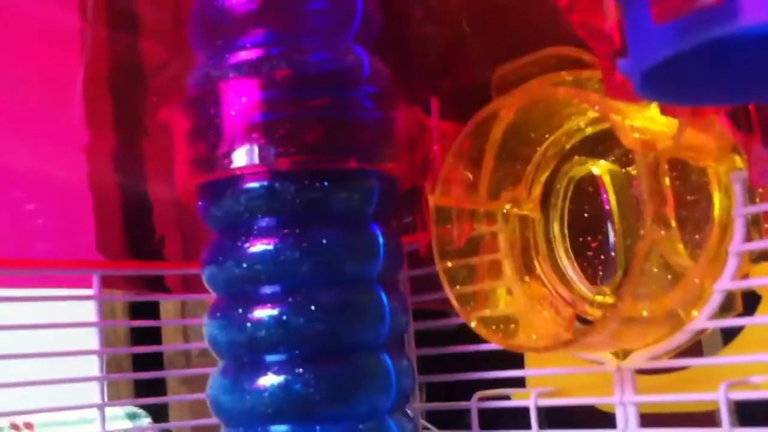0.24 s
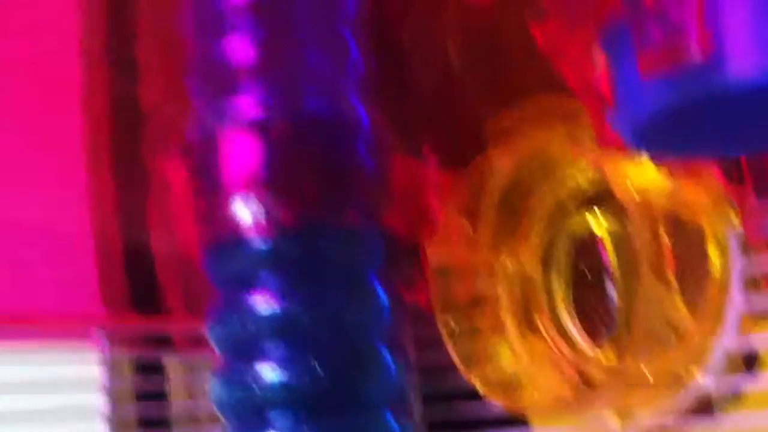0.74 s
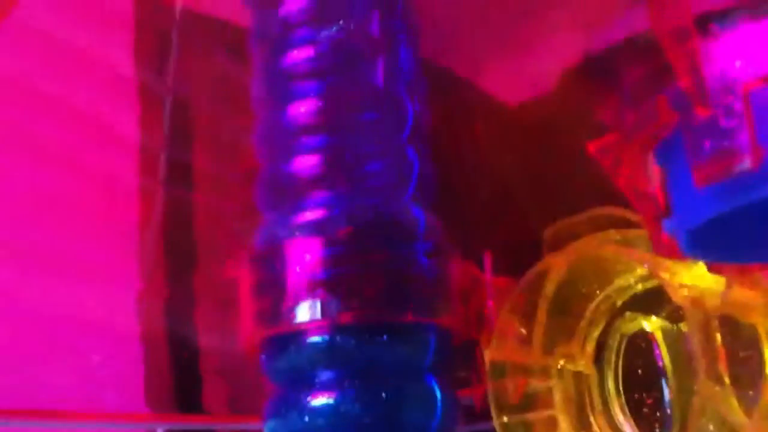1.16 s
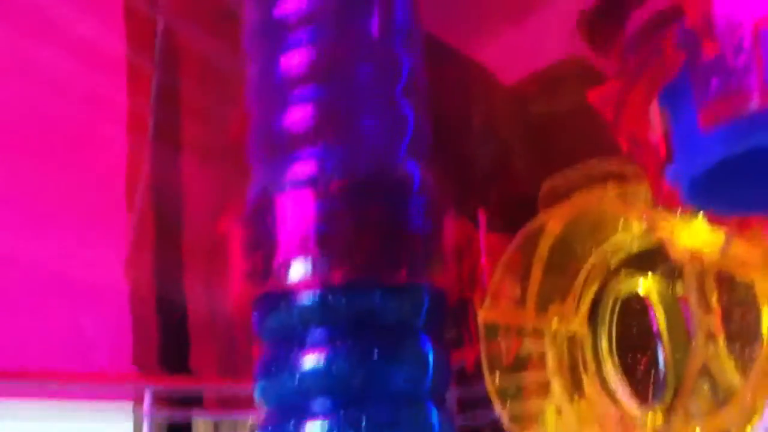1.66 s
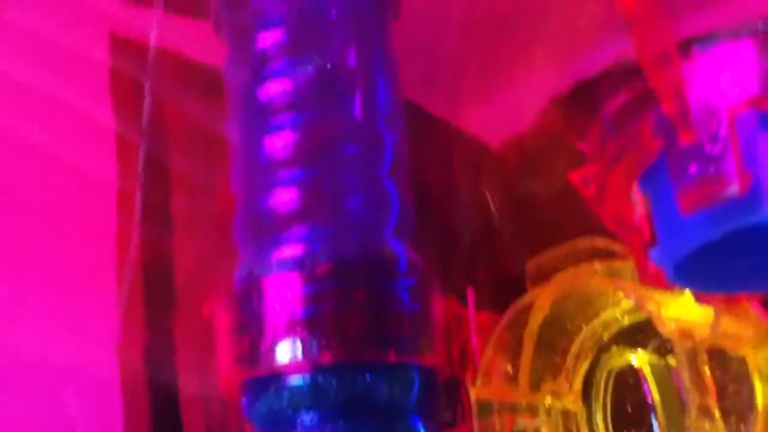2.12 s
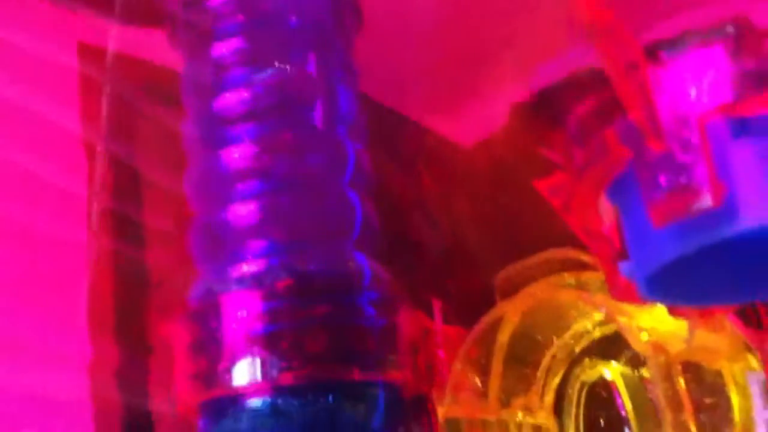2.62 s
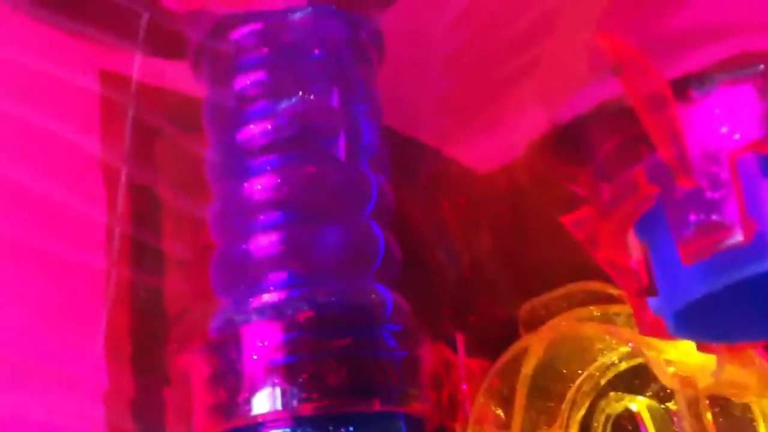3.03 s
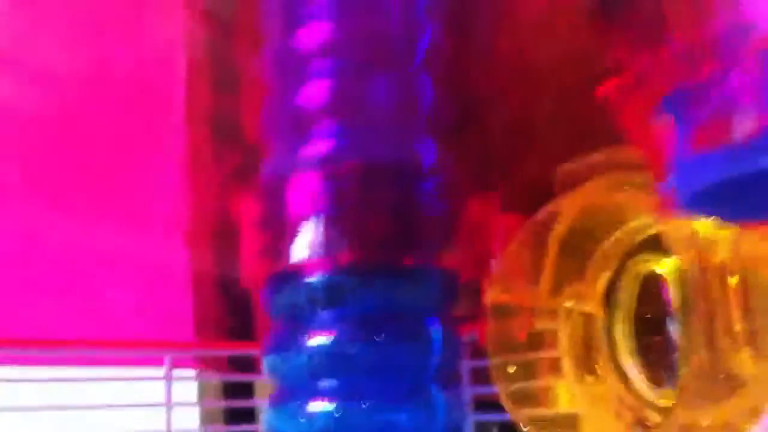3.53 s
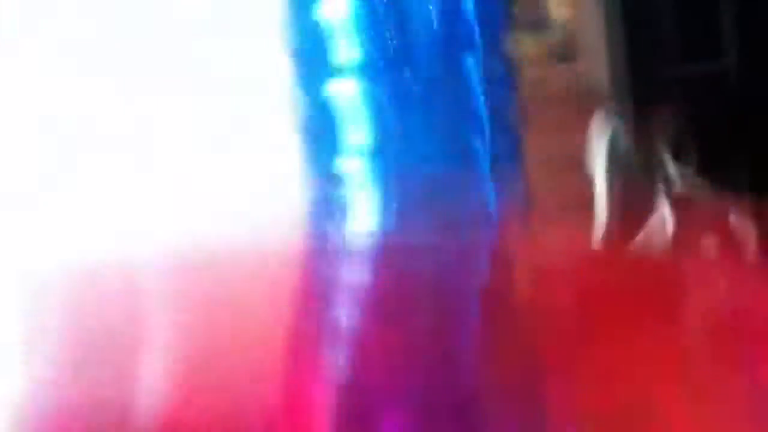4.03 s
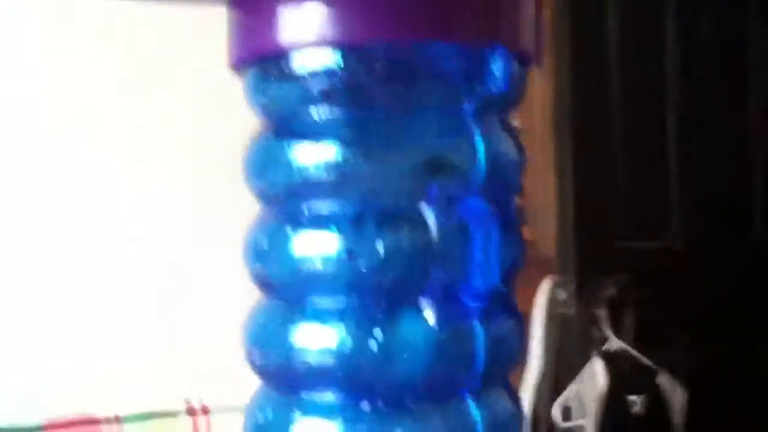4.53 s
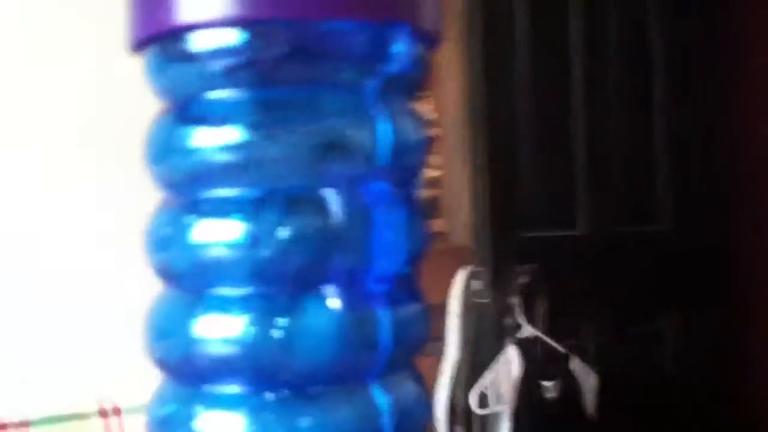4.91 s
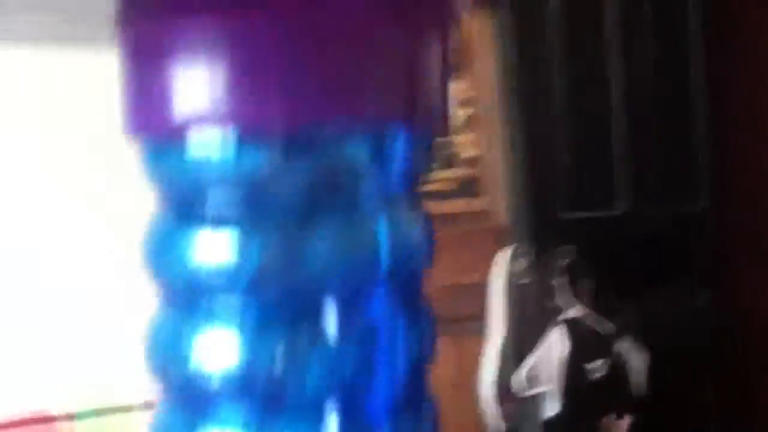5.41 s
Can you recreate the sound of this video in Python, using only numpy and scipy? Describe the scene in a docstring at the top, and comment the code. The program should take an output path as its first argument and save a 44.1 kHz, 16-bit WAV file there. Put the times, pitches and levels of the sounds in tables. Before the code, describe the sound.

Close handheld mono pickup indoors, very quiet at first: hiss, faint hum, grainy rustling of fur and shavings, light claw ticks with a short plastic ring. A sparse middle gives way to stronger taps, then abrupt overloaded thuds and cracks on the microphone body just after four seconds. The background dips and creeps back, with clearer taps near five and another sharp knock at about five and a half.

```python
"""Soft hiss and a low, wavering hum fill a quiet room, with faint rustles: a hamster in a plastic tube and bedding.
Grainy friction noise makes its shuffling bouts, among soft patches of pitched noise; claws tap on the tube
and excite its damped modes. Later the hand-held camera is bumped and rubbed: dry decaying thuds, cracks and
ticks, with the hiss and drag of skin. The hardest bumps make the gain control turn everything down,
after which the level creeps back."""
import sys
import numpy as np
from scipy import signal
from scipy.fft import rfft, irfft
from scipy.io import wavfile
from scipy.ndimage import uniform_filter1d

SR = 44100
rng = np.random.default_rng(int(sys.argv[2]) if len(sys.argv) > 2 else 0)


def wrap_up_sound(samples):
    """Save the sound to the file named by the first command line argument, as 16-bit audio."""
    columns = np.atleast_2d(samples).T
    # keep every value between -1 and 1, then stretch to whole-number steps
    tamed = np.clip(columns, -1, 1)
    steps = np.round(tamed * 32767).astype(np.int16)
    wavfile.write(sys.argv[1], SR, steps)


N = 249606
TIME = np.arange(N) / SR   # seconds


def from_db(db):
    """Decibels are twenty times the logarithm of an amplitude ratio; this returns the ratio."""
    return 10 ** (np.asarray(db) / 20)


def rms_one(x):
    """Dividing by the root mean square gives unit effective amplitude."""
    return x / np.sqrt(np.mean(x ** 2) + 1e-20)


def band(x, low_hz, high_hz, order=2):
    """A Butterworth band-pass has a maximally flat response between its two edges."""
    edges = [low_hz, min(high_hz, .47 * SR)]
    return signal.sosfilt(signal.butter(order, edges, "band", fs=SR, output="sos"), x)


def add(out, s, x):
    """Superposition: pressures add, so x is summed into out from time s in seconds."""
    at = max(int(s * SR), 0)
    out[at:at + len(x)] += x[:max(N - at, 0)]


def coloured_noise(spectrum):
    """White noise weighted in frequency takes on the given spectrum; the result has rms 1."""
    hz, db = np.transpose(spectrum)
    bins_hz = np.fft.rfftfreq(N, 1 / SR)
    gain = from_db(np.interp(np.log(bins_hz + 1), np.log(hz), db))
    return rms_one(irfft(rfft(rng.standard_normal(N)) * gain, N))


def dying(t, t60):
    """Linear damping gives exponential decay: the amplitude falls by 60 dB in t60 seconds."""
    return from_db(-60 * t / t60)


def wander(size, per_s):
    """Irregular modulation: straight lines join per_s random values a second."""
    steps = TIME[:size] * per_s
    knots = rng.standard_normal(int(steps[-1]) + 2)
    return np.interp(steps, np.arange(len(knots)), knots)


def stroke(start, length, attack_s, release_t60, ease_db_per_s=0):
    """Envelope of one frictional movement: linear attack, a hold that may ease off, exponential release."""
    t = np.maximum(TIME - start, 0)
    attack = np.minimum(t / attack_s, 1)
    easing = from_db(-ease_db_per_s * t)
    return attack * easing * dying(np.maximum(t - length, 0), release_t60)


def room_tone(hiss_db=-66.5):
    """Stationary broadband noise is heard as hiss; noise in a narrow band wavers in level, as hum."""
    # Spectrum of the hiss. Each row: frequency in Hz, relative level in dB per Hz.
    room_spectrum = [(18, -36.5), (30, -27.5), (81, -32), (103, -11.5), (165, -4), (204, -3), (336, -9.5),
                     (740, -19), (988, -20.5), (1960, -21.5), (2610, -24), (4300, -25), (8520, -25),
                     (12000, -38), (16000, -39.5)]
    # Components of the hum. Each row: centre in Hz, bandwidth in Hz, rms level in dB.
    hum_bands = [(119.54, 8.8, -72), (167.5, 12, -70), (354, 41, -79.5)]
    hum = 0
    for hz, width, db in hum_bands:
        noise = rng.standard_normal(N + SR)
        settled = band(noise, hz - width / 2, hz + width / 2)[SR:]   # the filter's build-up is dropped
        hum = hum + from_db(db) * rms_one(settled)
    return hum + from_db(hiss_db) * coloured_noise(room_spectrum)


def shuffle(grain_db=3.5, level_db=-2.0, shavings_db=-12.0, clump_db=2.5, stride_db=4.0):
    """Sliding friction is noise in little catches: body on tube, shavings above, swelling irregularly together."""
    # Bouts of the body along the tube and shavings.
    # Each row: start in seconds, length in seconds, level in dB before level_db.
    bout_rows = [(0.574, 0.045, -63), (0.652, 0.069, -68), (1.53, .18, -66), (1.77, 0.19, -62),
                 (2.014, 0.21, -71), (3.256, 0.18, -65), (3.488, 0.32, -65), (3.884, .08, -68),
                 (4.204, 0.075, -53), (4.432, .06, -64), (4.619, 0.05, -64.5), (4.735, 0.055, -59),
                 (4.935, 0.071, -63.5), (5.202, 0.033, -71), (5.366, 0.12, -60)]
    # Colour of fur and feet rubbing on the tube. Each row: frequency in Hz, relative level in dB per Hz.
    rub_spectrum = [(250, -39), (520, -6), (720, -1), (1500, -4), (1900, -6.5), (2700, -9.5), (3650, -1),
                    (4300, -20), (6000, -42)]
    attack_s, release_t60 = 0.022, 0.15
    fidget_db = -74.5   # rustle between the bouts, before level_db

    catches = from_db(grain_db * wander(N, 260))
    rub = rms_one(coloured_noise(rub_spectrum) * catches)
    shavings = band(rng.standard_normal(N), 5800, 10500)
    shavings = rms_one(shavings * from_db(clump_db * wander(N, 99)))
    sound = rub + from_db(shavings_db) * shavings
    bouts = sum(from_db(db) * stroke(s, length, attack_s, release_t60) for s, length, db in bout_rows)
    level = np.hypot(bouts, from_db(fidget_db))
    swell = from_db(level_db + stride_db * wander(N, 22))
    return level * swell * sound


def noise_patch(hz, length, skirt_db=-8.5, grain_db=4.0):
    """A grainy noise band swells and fades around one pitch, which sinks; higher is broader."""
    sag = .06   # the pitch starts this share above hz and ends as far below
    size = int(2 * length * SR)
    grains = rng.standard_normal(size) * from_db(grain_db * wander(size, 450))
    octaves = np.log2((np.fft.rfftfreq(size, 1 / SR) + 1) / hz)
    core = np.exp(-(octaves / (.06 + hz / 50000)) ** 2)
    skirt = from_db(skirt_db) * np.exp(-(octaves / .5) ** 2) / 2
    steady = signal.hilbert(irfft(rfft(grains) * (core + skirt), size))
    # turning the analytic signal's phase shifts all its frequencies
    shift_hz = sag * hz * np.linspace(1, -1, size)
    sinking = np.real(steady * np.exp(2j * np.pi * np.cumsum(shift_hz) / SR))
    swell = np.hanning(size) ** 2
    return rms_one(sinking * swell) * np.sqrt(np.mean(swell ** 2))


def soft_patches(faint_db=-76.0, spread_db=5.5, faint_s=0.031, count=190):
    """Soft noise patches add up: the clear ones, and many fainter at random in a middle and a high range."""
    # The clearest faint patches of pitched noise. Each row: middle in seconds,
    # half-span of the swell in seconds, level in dB, centre in Hz.
    clear_patches = [(.063, 0.048, -65.5, 3800), (0.306, .05, -70.5, 2570), (.695, 0.049, -65, 2480),
                     (0.7, 0.016, -62, 1530), (0.76, .024, -61, 3300), (0.761, 0.048, -67, 8050),
                     (0.832, .028, -68, 2700), (0.853, .044, -70, 8900), (0.901, 0.042, -67.5, 3080),
                     (.962, 0.04, -64.5, 2700), (1.193, 0.056, -68, 3420), (1.298, .03, -71, 3150),
                     (1.395, .044, -65, 3780), (1.61, 0.031, -64.5, 3540), (1.721, 0.048, -63, 7400),
                     (1.816, 0.039, -53.5, 7100), (2.159, 0.057, -80, 2860), (2.244, 0.041, -72, 3130),
                     (2.428, 0.052, -65, 3700), (2.898, 0.037, -65.5, 8150), (3.26, .044, -63, 3510),
                     (3.301, 0.04, -67, 3270), (3.347, .044, -68, 3550), (3.715, 0.025, -64, 3000),
                     (3.797, 0.017, -66, 3730), (3.84, 0.046, -64.5, 7860), (3.888, .028, -63.5, 3500),
                     (3.946, 0.038, -67, 2340), (4.249, .04, -54, 2300), (4.495, 0.025, -59.5, 1480),
                     (4.641, 0.02, -62, 1500), (4.656, 0.013, -64, 4090), (4.686, 0.023, -57.5, 3760),
                     (4.864, 0.037, -63.5, 7600), (4.901, 0.027, -59.5, 3270), (4.922, 0.019, -63, 4040),
                     (4.978, 0.019, -60, 2680), (5.065, 0.025, -62.5, 3790), (5.093, 0.032, -69, 3800),
                     (5.136, 0.058, -65.5, 7600), (5.195, .04, -69.5, 3600), (5.23, .03, -67.5, 1850),
                     (5.278, .044, -63, 8330), (5.349, 0.048, -68.5, 8880), (5.406, 0.043, -64, 1950)]
    out = np.zeros(N)
    for s, length, db, hz in clear_patches:
        add(out, s - length, from_db(db) * noise_patch(hz, length))
    for k, (when, pitch, force, kind) in enumerate(rng.random((count, 4))):
        in_middle_range = kind < .7
        hz = 2300 + 1600 * pitch if in_middle_range else 6600 + 2600 * pitch
        start = (k + when) / count * TIME[-1]
        add(out, start, from_db(faint_db + spread_db * force ** 2) * noise_patch(hz, faint_s))
    return out


def tube_response(t, click_db=15.0, crack_t60=0.023, room_db=-15.5, room_t60=0.13, scatter_db=3.5,
                  cage_db=-13.5, cage_t60=0.25):
    """Impulse response: a click, a crack of dense modes, the tube's modal ring, cage rattle and the room's tail."""
    # Ring of the tube. Each row: frequency in Hz, relative level in dB, t60 in seconds before the cap below.
    tube_modes = [(358, -4.5, .2), (669.3, 3, 0.14), (745.4, 2, 0.14), (920, 3.5, .14), (2040, 0.5, 0.071),
                  (1304, 2, 0.13), (1504, 7.5, 0.04), (1610, 7, 0.052), (2220, 0, 0.059), (2750, 6, 0.037),
                  (3144, 7, 0.027), (3500, 7, 0.033), (3710, 12.5, 0.039)]
    ring_db, longest_t60 = -27.0, .12
    ring = 0
    for hz, db, t60 in tube_modes * 2:
        own_hz = hz * rng.normal(1, .025)   # each section is tuned a little differently
        strength = from_db(db + scatter_db * rng.standard_normal())
        decay = dying(t, min(t60, longest_t60))
        ring = ring + strength * decay * np.sin(2 * np.pi * (own_hz * t + rng.random()))
    crack, cage, room = rng.standard_normal((3, len(t)))
    click = from_db(click_db) * (t == 0)
    crack = crack * dying(t, crack_t60)
    cage = from_db(cage_db) * band(cage, 173, 1300) * dying(t, cage_t60)
    room = from_db(room_db) * room * dying(t, room_t60)
    return click + crack + from_db(ring_db) * ring + cage + room


def claws(catches_per_s=1300, first_catch=1.14, high_t60=0.047):
    """Impulsive excitation: a run of tiny catches is convolved with the tube's response; the treble dies first."""
    # Claws on the tube; each spot favours one low note and one bright pitch. Each row: start in seconds,
    # contact length in seconds, level in dB, hardness in dB (what a bare claw adds to the middle band and a
    # soft pad takes away), tick in dB above the level, note in Hz, note level in dB, bright pitch in Hz.
    taps = [(.588, .0035, -64, -4, -16, 885, -70, 3500), (.61, 0.0078, -61, 0.5, -4.5, 965, -57, 3500),
            (.652, 0.0019, -55.5, -12.5, -18.5, 730, -60, 2700),
            (0.777, 0.0034, -50.5, -7.5, -16, 905, -66, 2220),
            (1.342, 0.0054, -74.5, 8.5, 11.5, 910, -77, 3500),
            (1.504, 0.0036, -49, -2.5, -16, 742, -57, 3240),
            (1.579, 0.013, -59.5, 0, -10.5, 1550, -51, 3500),
            (1.668, 0.02, -54.5, -3.5, -15.5, 825, -64, 3270),
            (1.765, 0.0058, -58, 1.5, -8, 736, -46, 3500), (1.785, 0.0075, -54, -12, -30, 690, -44, 3550),
            (1.797, 0.0028, -51.5, 2, -16, 980, -51, 3060), (1.814, 0.012, -45, -2, -16, 1458, -39, 3300),
            (1.829, 0.0061, -46, -8, -34, 867, -40.5, 3500),
            (1.918, 0.0073, -50, -1.5, -11.5, 1550, -54, 3580),
            (1.952, 0.0028, -53, -6, -30, 800, -51, 3450), (2.072, 0.0042, -62, -1.5, -22, 900, -64, 3360),
            (2.334, 0.0097, -60.5, 1.5, -8.5, 896, -63, 2700), (2.608, .004, -79, 3, 13.5, 880, -68, 3500),
            (3.463, 0.0015, -58, -2.5, -22, 890, -64, 3520), (3.488, 0.0039, -43.5, 3, -10, 970, -59, 2800),
            (3.4942, 0.0013, -47.5, 8, 3, 1230, -44, 2820), (3.507, .012, -49.5, -22, -22, 990, -58, 2900),
            (3.533, 0.0014, -43.5, -6, -25, 741, -42, 3480), (3.545, 0.016, -56, -28, -33, 380, -50, 2810),
            (3.601, 0.016, -67, 2.5, -26, 1460, -50, 2080), (3.68, 0.0029, -54.5, -12, -31, 810, -57, 3520),
            (3.7283, 0.0034, -40, -3, -18, 663, -45, 3460), (4.28, 0.011, -50.5, -11, -18, 596, -44, 2480),
            (4.515, 0.0036, -44.5, 2, -11.5, 701, -50.5, 3680),
            (4.743, 0.0051, -40, 0, -26, 720, -48, 2590), (4.786, .004, -53, -4, -27, 727, -43, 2580),
            (4.792, 0.0054, -42.5, -11.5, -22.5, 702, -37, 2600),
            (4.94, .008, -56, -8, -15, 685, -36.5, 2510),
            (4.9856, 0.0036, -38.5, -3, -17.5, 666, -35.5, 2710)]
    # Low, middle and high band of a tap. Each row: lower edge in Hz, upper edge in Hz.
    tap_bands = [(280, 1850), (1800, 3950), (4700, 11000)]
    note_attack_s, note_t60 = 0.0044, 0.085   # the low note builds up over a few cycles
    note_sag, note_sag_s = 0.15, 0.0072   # it starts sharp by this share and settles as the foot lets go
    bright_db, bright_q = 4.5, 13   # level and sharpness of the added bright resonance
    hollow_hz, hollow_q = 526, 5.8   # the tube hardly answers between its two lowest modes

    out, t = np.zeros(N), TIME[:SR // 5]
    filters = [signal.butter(6, edges, "band", fs=SR, output="sos") for edges in tap_bands]
    for s, length, db, hardness_db, tick_db, note_hz, note_db, bright_hz in taps:
        size = max(int(length * SR), 2)
        catches = (rng.random(size) < catches_per_s / SR) * rng.normal(0, 0.65, size)
        catches[0] = first_catch
        sound = signal.fftconvolve(catches, tube_response(t))[:len(t)]
        low, middle, high = (signal.sosfilt(sos, sound) for sos in filters)
        low = signal.lfilter(*signal.iirnotch(hollow_hz, hollow_q, fs=SR), low)
        bright = signal.lfilter(*signal.iirpeak(bright_hz, bright_q, fs=SR), middle)
        middle = middle + from_db(bright_db) * bright
        high = high * dying(np.maximum(t - length, 0), high_t60)
        # levels hold over the contact and the 8 ms after it
        attack = size + SR // 125
        for part, colour_db in ((low, 0), (middle, hardness_db), (high, tick_db)):
            add(out, s, from_db(db + colour_db) * part / np.std(part[:attack]))
        cycles = note_hz * (t + note_sag * note_sag_s * (1 - np.exp(-t / note_sag_s)))
        note = np.sin(2 * np.pi * cycles) * np.minimum(t / note_attack_s, 1) * dying(t, note_t60)
        add(out, s, from_db(note_db) * note)
    return out


def contacts():
    """A hard impact begins with a lighter, higher touch: returns the bumps and these touches in like rows."""
    # Bumps on the camera body. Each row: start in seconds, thud peak in dB, thud pitch in Hz,
    # cycles in which the thud decays by 60 dB, crack peak in dB, tick peak in dB.
    bumps = [(3.588, -53, 300, 3, -72, -40.5), (4.0248, -14, 580, 4.7, -31, -43.5),
             (4.0275, -1.5, 427, 5.5, -28, -39), (4.0315, -15, 1340, 7.3, -17.5, -33),
             (4.0334, -4.5, 427, 5.3, -28, -32), (4.0381, -16.5, 240, 4, -30.5, -35.5),
             (4.0471, -8, 340, 5.4, -29, -39.5), (4.0523, -39, 392, 3, -26.5, -21.5),
             (4.06, -7.5, 920, 6.2, -19.5, -43.5), (4.0634, -14.5, 365, 3.5, -31, -41.5),
             (4.0682, -39, 1294, 3, -27, -40), (4.0742, -23.5, 1163, 3.5, -2, -32.5),
             (4.0902, -27.5, 445.6, 6.5, -41.5, -58), (4.142, -33.5, 583, 3.9, -34, -38.5),
             (4.1509, -20, 234.8, 9.7, -18.5, -50), (4.1614, -30, 280, 6, -28, -38),
             (4.185, 3.5, 279, 1.8, 2.5, 3.5), (4.203, -39.5, 700, 4, -39.5, -57.5),
             (4.7314, -29.5, 227, 3.1, -26, -16.5), (4.8463, -42, 201, 3, -41, -41),
             (5.4394, 0, 275, 2.9, 3, 3.5), (5.4595, -28.5, 600, 6.2, -43, -44.5)]
    hard_bump_db = -1   # a thud above this counts as hard
    lead_s, touch_hz = .005, 540
    touch_db, touch_tick_db = -23, -37.5   # relative to the bump
    touches = []
    for s, thud_db, _, cycles, crack_db, tick_db in bumps:
        if thud_db > hard_bump_db:
            touches.append((s - lead_s, thud_db + touch_db, touch_hz, cycles,
                            crack_db + touch_db, tick_db + touch_tick_db))
    return bumps + touches


def camera_bumps(case_hz=200, case_t60=0.014, case_db=-17.0, stiff_hz=125, crack_low_hz=700):
    """Structure-borne knocks are dry: a damped thud, a shell crack, thinner for a higher thud, and a tick."""
    # Short ring of the camera's shell. Each row: frequency in Hz, relative level in dB, t60 in seconds.
    shell_modes = [(1054, 0.5, 0.0037), (1320, -0.5, 0.012), (1850, 5, 0.0026), (2730, 2.5, 0.004),
                   (3500, 2, 0.0025)]
    out, t = np.zeros(N), TIME[:SR // 8]
    case = np.sin(2 * np.pi * case_hz * t) * dying(t, case_t60)
    shell = 0
    for k, (hz, db, t60) in enumerate(shell_modes):
        polarity = (-1) ** k
        shell = shell + polarity * from_db(db) * np.sin(2 * np.pi * hz * t) * dying(t, t60)
    for s, thud_db, hz, cycles, crack_db, tick_db in contacts():
        thud = np.sin(2 * np.pi * hz * t) * dying(t, cycles / hz)
        body = band(thud + from_db(case_db) * case, stiff_hz, 3100, order=3)
        contact = (t == 0) + .12 * rng.standard_normal(len(t)) * dying(t, .008)
        crack = signal.fftconvolve(contact, shell)[:len(t)]
        crack = band(crack, max(crack_low_hz, hz), 4200, order=3)   # a higher thud means a smaller contact
        tick = band(contact, 7000, 10800)
        for db, part in ((thud_db, -body), (crack_db, crack), (tick_db, tick)):
            add(out, s, from_db(db) * part / np.abs(part).max())
    return out


def grip(grain_db=4.5):
    """Stick-slip friction of skin on the case: a hiss, and a dull drag where it presses harder."""
    # The hand sliding on the camera. Each row: start in seconds, length in seconds,
    # hiss level in dB, dull drag level in dB, both before the grain.
    slides = [(3.994, 0.0097, -45.5, -74.5), (4.003, 0.0079, -39.5, -77), (4.021, 0.049, -36, -28.5),
              (4.07, 0.02, -59.5, -34.5), (4.099, 0.02, -58, -50), (4.122, 0.0085, -50, -58),
              (4.135, 0.056, -63, -44), (4.728, 0.045, -61, -40), (4.849, 0.012, -74, -51.5),
              (5.415, 0.031, -63.5, -73)]
    # Colour of the hiss. Each row: frequency in Hz, relative level in dB per Hz.
    grip_spectrum = [(88, -38.5), (150, 0.5), (1010, -9), (1380, -2), (1950, -9), (3210, -4), (6680, -19),
                     (8920, -22), (15000, -48)]
    attack_s, release_t60 = 0.0012, 0.0098
    hiss_ease, drag_ease = 84.5, 168.5   # dB per second, as the pressure eases during a slide
    hiss_level, drag_level = 0, 0
    for s, length, hiss_db, drag_db in slides:
        hiss_level = hiss_level + from_db(hiss_db) * stroke(s, length, attack_s, release_t60, hiss_ease)
        drag_level = drag_level + from_db(drag_db) * stroke(s, length, attack_s, release_t60, drag_ease)
    hiss = hiss_level * coloured_noise(grip_spectrum)
    drag = drag_level * rms_one(band(rng.standard_normal(N), 130, 750))
    return (hiss + drag) * from_db(grain_db * wander(N, 1000))


def faint_room(x, level_db=-40):
    """Reverberation: the little that comes back from the walls is x convolved with decaying noise."""
    t = TIME[:SR // 3]
    tail = band(rng.standard_normal(len(t)), 250, 1100) * dying(t, .14)
    return from_db(level_db) * signal.fftconvolve(x, tail / np.linalg.norm(tail))[:N]


def scene():
    """Superposition of the room, the animal, the soft patches and the handling of the camera, as one channel."""
    animal = shuffle() + claws()
    handling = camera_bumps() + grip()
    return (room_tone() + animal + soft_patches() + handling + faint_room(handling))[None]


def gain_control(x, ceiling_db=-10.5, release_db_per_s=13.0):
    """Peak limiting: levels above the ceiling pull the gain down at once; it comes back slowly."""
    power = np.abs(uniform_filter1d(x ** 2, size=130))
    level = 10 * np.log10(power + 1e-12)
    over = np.maximum(level - ceiling_db, 0)
    # a running maximum against a rising ramp holds each peak and releases it at a steady rate
    ramp = release_db_per_s * TIME
    held = np.maximum.accumulate(over + ramp, axis=-1) - ramp
    return x * from_db(-uniform_filter1d(held, size=40))


def record(dry, low_cut_hz=55, top=0.55, cutoff_hz=16100):
    """Transducer limits: the deep bass is lost, then come gain control, rounded peaks and the top cut."""
    thin = signal.sosfilt(signal.butter(2, low_cut_hz, "high", fs=SR, output="sos"), dry)
    held = gain_control(thin)
    rounded = held / (1 + (held / top) ** 4) ** (1 / 4)
    return signal.sosfilt(signal.ellip(10, .1, 80, cutoff_hz, fs=SR, output="sos"), rounded)


dry = scene()
out = record(dry)
wrap_up_sound(out)
```